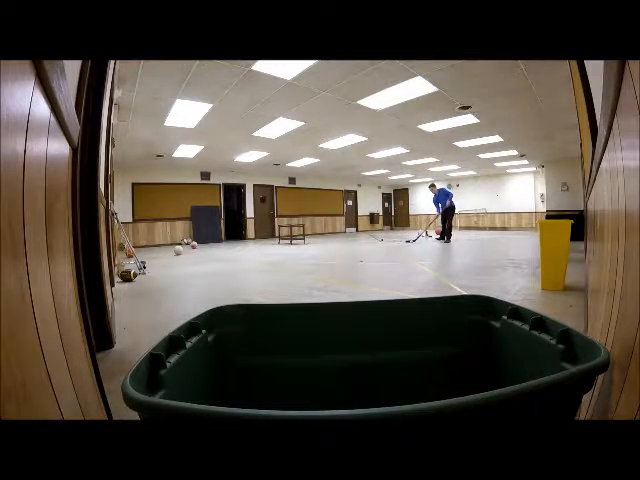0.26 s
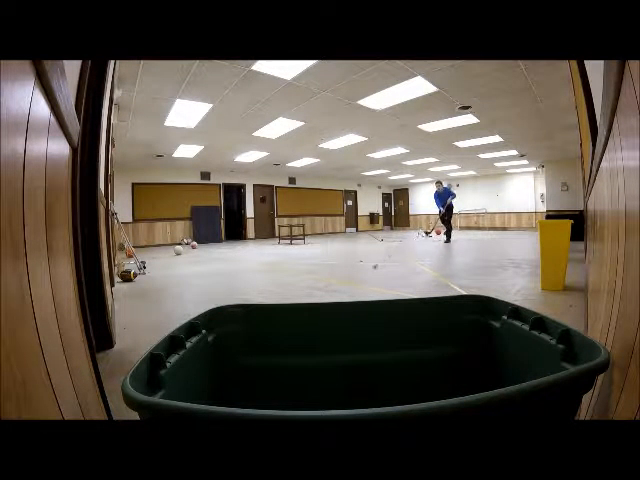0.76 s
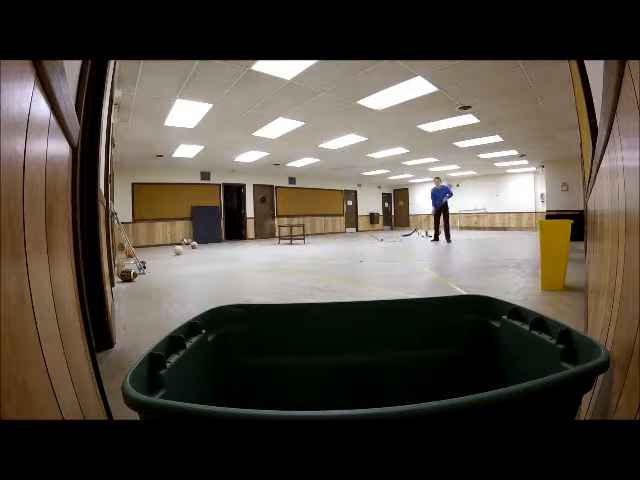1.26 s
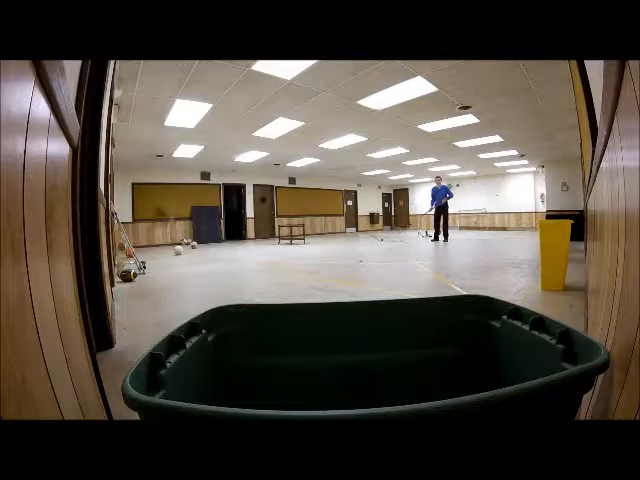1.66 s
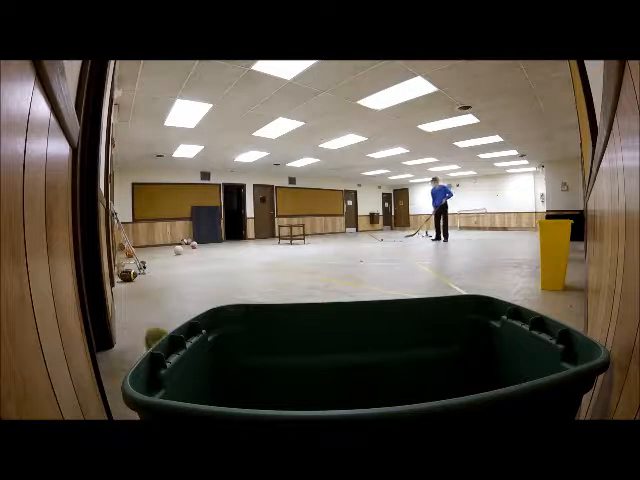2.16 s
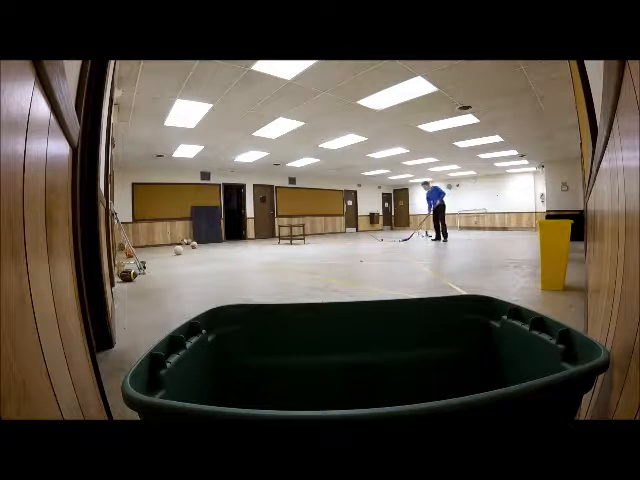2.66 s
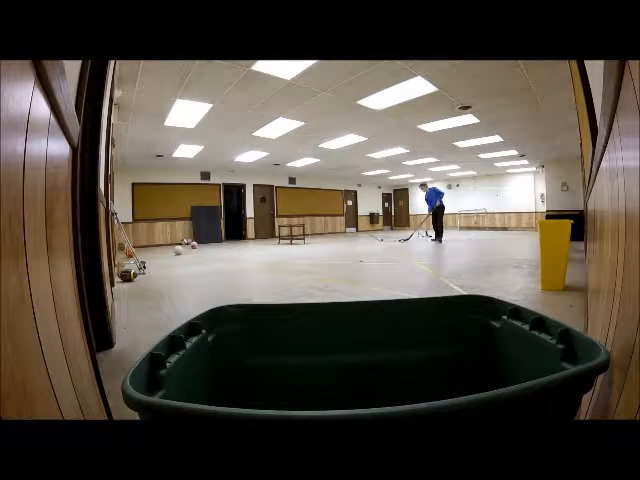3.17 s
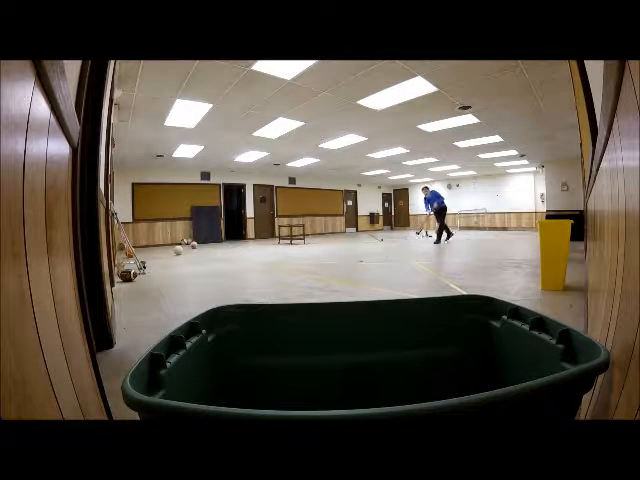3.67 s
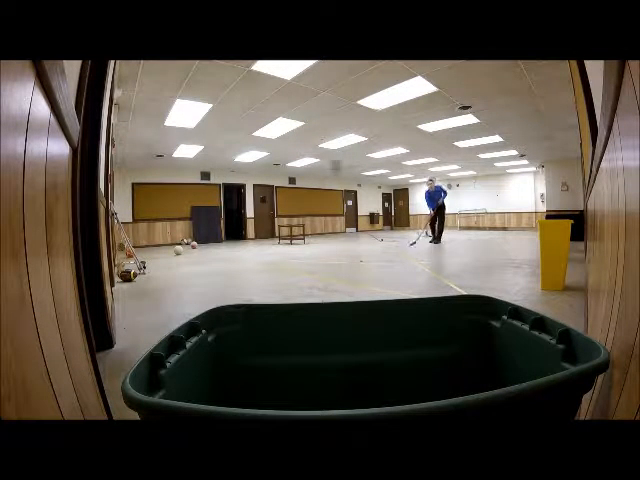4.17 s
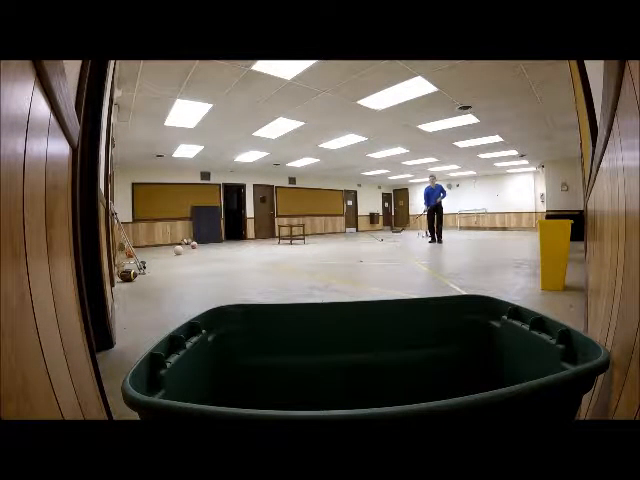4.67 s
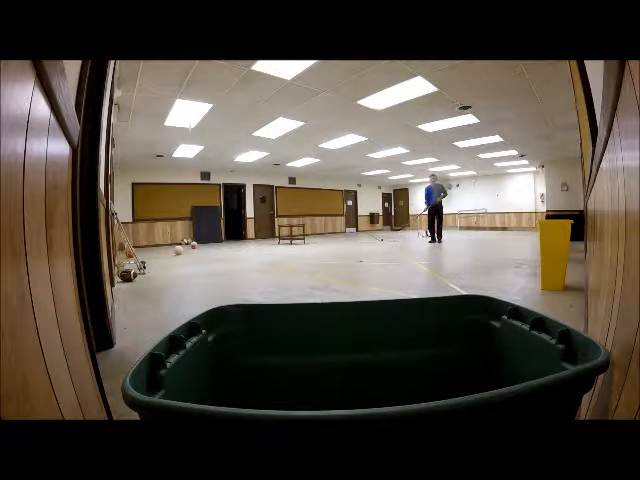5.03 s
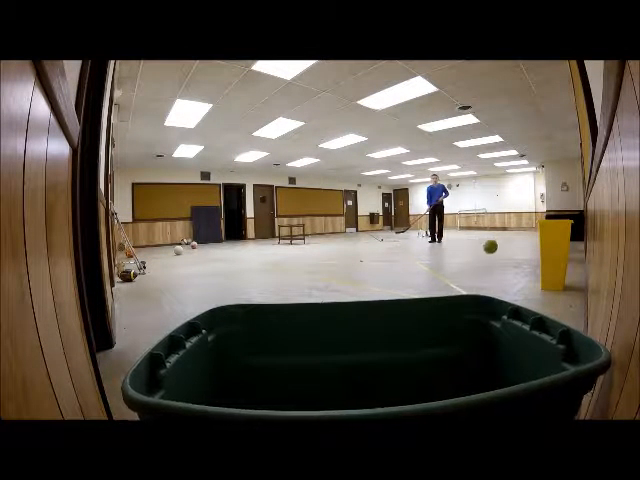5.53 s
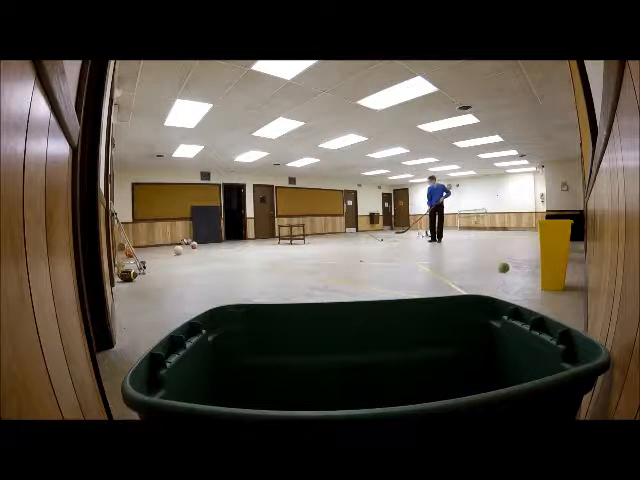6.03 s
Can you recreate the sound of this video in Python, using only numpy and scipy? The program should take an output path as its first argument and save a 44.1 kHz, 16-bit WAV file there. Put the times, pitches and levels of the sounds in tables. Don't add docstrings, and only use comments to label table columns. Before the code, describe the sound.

Rubber balls are swept by a stick across a big empty hall, thumping the floor, booming on wood panels and rattling a thin metal grille.

```python
import sys
import numpy as np
from scipy import signal
from scipy.fft import rfft, irfft, next_fast_len
from scipy.io import wavfile
from scipy.ndimage import map_coordinates

SR = 44100
rng = np.random.default_rng(int(sys.argv[2]) if len(sys.argv) > 2 else 0)


def invert_db(level):
    return 10 ** (np.asarray(level, dtype=float) / 20)


def persist_wave(psi):
    counts = np.round(np.clip(psi, -1, 1) * 32767).astype(np.int16)
    wavfile.write(sys.argv[1], SR, np.atleast_2d(counts).T)


N = 277830


def unit(x):
    return x / np.sqrt(np.mean(x ** 2) + 1e-20)


def along(points, hz):
    f, v = np.transpose(points)
    return np.interp(np.log(hz + 1), np.log(f + 1), v)


def filtered(x, response):
    m = next_fast_len(len(x) + 8192)
    return irfft(rfft(x, m) * response(np.fft.rfftfreq(m, 1 / SR)), m)[:len(x)]


def noise(spectrum, count):
    return unit(filtered(rng.standard_normal(count), lambda hz: invert_db(along(spectrum, hz))))


def wobble(rate):
    knots = rng.standard_normal(int(N * rate / SR) + 4)
    return map_coordinates(knots, [np.arange(N) * rate / SR])


def ring(t, hz, t60, rise):
    return np.sin(2 * np.pi * hz * t) * invert_db(-60 * t / t60) * (1 - np.exp(-(t / rise) ** 2))


def add(track, s, sound):
    start = round(s * SR)
    sound = sound[max(-start, 0):]
    part = track[max(start, 0):][:len(sound)]
    part += sound[:len(part)]


def swells(times, peaks_db, rise_db_s, fall_db_s, held=0):
    late = np.arange(N) / SR - np.asarray(times)[:, None]
    slope_db = np.minimum(rise_db_s * late, fall_db_s * (held - late))
    return np.asarray(peaks_db)[:, None] + np.minimum(0, slope_db)


# t/s, peak level/dB, f/Hz, t60/s
THUMPS = [
    (-.006, -11.5, 190, .065),
          (0.094, -20.5, 209.3, 0.12), (0.519, -21, 157, 0.039), (1.231, -35.5, 294, 0.068),
           (1.318, -14, 170, 0.045), (1.408, -25.5, 209, 0.054), (2.042, -6, 145, 0.047),
           (2.126, -16.5, 233, 0.028), (2.662, -19, 226, 0.036), (3.057, -20, 199, 0.04),
           (3.352, -28.5, 212, 0.058), (3.534, -24, 210, 0.021), (3.595, -17, 230, 0.032),
           (4.218, -13.5, 177, 0.05), (4.262, -21, 162, 0.042), (4.325, -21.5, 201.2, 0.032),
           (5.396, -7, 174, 0.043), (5.992, -13.5, 136, 0.018)]


def bounces():
    out, t = np.zeros(N), np.arange(SR // 5) / SR
    lag_s, push_db, push_hz, push_t60_s = .003, 3, 66, 0.089
    for s, db, hz, t60 in THUMPS:
        ball = invert_db(db + 9.5) * ring(t, hz, t60, rise=0.0026)
        slab = invert_db(db + push_db) * ring(t, push_hz, push_t60_s, rise=0.01)
        add(out, s + lag_s, ball - slab)
    return out


# t/s, rolling level/dB, shudder level/dB
STIRS = [
    (0.0, -38, -52.5),
    (.52, -33, -36.5),
    (1.43, -36, -30),
    (2.12, -72, -33.5),
    (3.2, -52.5, -38),
    (3.63, -32.5, -35.5),
    (3.75, -43, -40),
    (4.33, -34.5, -34),
    (5.55, -41, -40.5),
    (6.05, -63, -36),
]


def stirred(peaks_db, rest_db, rise_db_s, fall_db_s):
    times = [row[0] for row in STIRS]
    power = invert_db(swells(times, peaks_db, rise_db_s, fall_db_s)) ** 2
    return np.sqrt(power.sum(axis=0) + invert_db(rest_db) ** 2)


# t/s, depth level/dB
DUCKS = [
    (-.02, 8.5),
    (2.05, 2.2),
    (5.405, 2.5),
    (5.51, 9),
]


def ducking():
    drop_s, recover_s = .008, 0.25
    s, depth_db = np.transpose(DUCKS)[:, :, None]
    late = np.clip(np.arange(N) / SR - s, 0, None)
    return -np.sum(depth_db * (1 - np.exp(-late / drop_s)) * np.exp(-late / recover_s), axis=0)


# f/Hz, level/dB (per Hz)
RUMBLE = [(8, -26.5), (18, 8), (40, -2.5), (62, -8), (110, -9.5), (147, -6.5), (200, -12), (360, -31.5),
          (530, -33.5), (900, -50.5), (1500, -120)]
# f/Hz, level/dB (per Hz)
HISS = [(240, -46.5), (400, -4.5), (600, -5), (1000, -7), (2000, -11.5), (4000, -16.5), (8000, -24.5),
        (10000, -28), (13000, -35.5), (15300, -56), (17000, -100)]


def background():
    t, duck_db = np.arange(N) / SR, ducking()
    shudder = stirred(np.transpose(STIRS)[2], rest_db=-41, rise_db_s=55, fall_db_s=39)
    rumble = shudder * invert_db(1 + 2.42 * wobble(6.6)) * noise(RUMBLE, count=N)
    duct = noise([(30, -100), (62, -15.0), (76, 16.0), (85, 13.5), (95, 9.5), (106, 14.0),
                  (135, -11.0), (260, -110)], count=N)
    drone = invert_db(-43 + 0.43 * duck_db + 3.5) * duct
    flicker = 2 * np.cos(2 * np.pi * 15.5 * t)
    whine = invert_db(-86) * flicker * np.sin(2 * np.pi * 9635 * t + wobble(8))
    hiss = invert_db(-60.5) * noise(HISS, count=N)
    return rumble + drone + invert_db(duck_db) * (hiss + whine)


def rolling():
    travel = stirred(np.transpose(STIRS)[1], rest_db=-59, rise_db_s=103.5, fall_db_s=74.5)
    murmur = noise([(60, -100), (130, -31), (190, 1.5), (260, -2.5), (380, -7.0), (480, -23.5),
                    (700, -28.5), (1400, -110)], count=N)
    return travel * invert_db(1.85 * wobble(25)) * murmur


# t/s (delay), level/dB
ECHOES = [
    (0.0096, -8),
    (0.02, -11),
    (.052, -20),
]


def early_echoes(thumps, metal, rubber):
    out = np.zeros(N)
    for s, db in ECHOES:
        add(out, s, invert_db(db) * (invert_db(-9) * metal + invert_db(-9) * rubber + invert_db(-10.0) * thumps))
    return out


# f/Hz, t60/s
HALL = [(40, 0.85), (120, 0.52), (250, 0.44), (600, 0.37), (3000, 0.56), (6000, 0.44), (12000, 0.19)]


def hall(x):
    out, step = np.zeros(N), SR // 2
    starts = range(-step, N, step)
    hz, t, z = signal.stft(rng.standard_normal((len(starts), 3 * step // 2)), SR, nperseg=1024)
    fading = z * invert_db(-60 * t / along(HALL, hz)[:, None])
    tails = signal.istft(fading, SR, nperseg=1024)[1]
    padded, window = np.pad(x, (step, 2 * step)), signal.get_window("hann", 2 * step)
    for start, tail in zip(starts, tails):
        stretch = padded[start + step:][:2 * step] * window
        add(out, start / SR + .012, signal.fftconvolve(stretch, tail / np.linalg.norm(tail)))
    return out


# f/Hz, t60/s
BOOM_TONES = [
    [(21, 1.62), (45, 1.5)],
    [(92, 0.24), (108, 0.21)],
    [(150, 0.27), (165, 0.16)],
    [(200, 0.24), (222, 0.13)],
]
# t/s, then sway, deep, middle and upper level/dB
HARD_BOOMS = [
    (0.079, -27, -16, -27, -16),
    (2.042, -22.5, -8, -22, -38.5),
    (5.49, -12, -3.5, -27.5, -3),
    (5.52, -15.5, -28, -25, -34),
    (5.59, -21, -20, -19, -28.5),
]
# t/s, then sway, deep, middle and upper level/dB
SOFT_BOOMS = [
    (0.321, -29, -40, -27, -21),
    (2.45, -28.5, -25, -11.5, -14),
    (3.153, -31.5, -10.5, -48, -52),
]


def booms():
    out, t = np.zeros(N), np.arange(SR * 5 // 4) / SR
    fade = np.cos(np.pi / 2 * t / t[-1])
    lag_s, hard_contact_s, soft_contact_s = .0003, 0.002, .007
    blows = [(row, hard_contact_s) for row in HARD_BOOMS]
    blows += [(row, soft_contact_s) for row in SOFT_BOOMS]
    for (s, *levels), contact in blows:
        for db, pair in zip(levels, BOOM_TONES):
            tones = sum(ring(t, hz, t60, contact * (1 + (45 / hz) ** 2)) for hz, t60 in pair)
            add(out, s + lag_s, -invert_db(db - 1.5) * fade * tones)
    heavy = signal.butter(4, 280, fs=SR, output="sos")
    return signal.sosfilt(heavy, out)


# t/s, peak level/dB, centre f/Hz, t60/s, shell ring level/dB
SLAPS = [(0.095, -51, 1830, 0.043, -58), (0.446, -39, 2010, 0.045, -55), (0.5172, -34, 2180, 0.0376, -41.5),
         (1.24, -47.5, 2600, 0.11, -61), (1.321, -38, 805, 0.071, -62), (2.04, -28, 2880, 0.018, -49.5),
         (2.047, -32, 1860, 0.032, -55), (2.1279, -36, 2010, 0.0448, -37), (2.14, -46, 1800, 0.043, -62),
         (2.6653, -45.5, 2160, 0.045, -36.5), (2.676, -40, 2100, 0.049, -57),
         (3.0623, -53, 1900, 0.075, -41.5), (3.356, -57, 3150, 0.04, -45.5),
         (3.5362, -37, 1950, 0.046, -46), (3.5874, -45, 2030, 0.043, -57), (3.627, -36.5, 2930, 0.054, -53),
         (4.2204, -28, 2920, 0.028, -44), (4.2303, -36.5, 3050, 0.1, -45),
         (5.3988, -27, 2390, 0.025, -50.5), (5.4902, -29.5, 1870, 0.024, -41),
         (5.9948, -40, 2340, 0.027, -47)]
# t/s, peak level/dB, centre f/Hz, t60/s
SCUFFS = [
    (2.456, -42, 5200, 0.022),
    (2.679, -45.5, 4600, 0.11),
    (2.699, -51.5, 3230, 0.47),
    (5.409, -26.5, 3100, 0.017),
    (5.414, -45, 4584, 0.026),
    (5.425, -46, 3280, 0.04),
    (5.452, -45.5, 3067, 0.048),
    (5.518, -54, 2700, .03),
    (5.543, -46.5, 2630, .04),
]
# f/Hz, level/dB (per Hz)
SLAP_COLOUR = [(410, -15), (700, -4.5), (1860, -6), (3170, -6), (4070, -13.5), (6780, -24.5), (9570, -33),
               (12000, -38.5), (15600, -64), (22000, -120)]


def slaps():
    out, t = np.zeros(N), np.arange(SR // 4) / SR
    for s, db, centre_hz, t60, *_ in SLAPS + SCUFFS:
        def colour(hz):
            bright_band = np.exp(-(np.log((hz + 1) / centre_hz) / 0.12) ** 2)
            return 1.1 * invert_db(along(SLAP_COLOUR, hz)) + bright_band
        burst = unit(filtered(rng.standard_normal(len(t)), colour))
        add(out, s, invert_db(db - 5) * burst * invert_db(-60 * t / t60) * (1 - np.exp(-t / 0.0013)))
    for s, *_, shell_db in SLAPS:
        add(out, s, invert_db(shell_db + 5) * ring(t, 1227, 0.023, rise=0.0007))
    return out


# full speed t/s, held t/s, level/dB, grit bites at t/s, grit level/dB
SWEEPS = [
    (.465, 0.052, -45.5, .45, -54.5),
    (3.61, 0.033, -44, 3.535, -55),
]
# f/Hz, level/dB (per Hz)
BLADE = [(250, -40), (450, -3), (800, -4), (1300, 0), (2000, -2), (3000, -3), (4500, -8), (6000, -30),
         (9000, -110)]
# f/Hz, level/dB (per Hz)
GRIT = [(3800, -44), (4800, -4.5), (5800, -5.5), (6700, -11.5), (7900, -6), (9500, -22), (12000, -37),
        (14000, -76)]


def sweeps():
    out, t = np.zeros(N), np.arange(N) / SR
    band_low_hz, band_high_hz, climb_s = 2090, 2980, 0.021
    grit = invert_db(3.1 * wobble(900) + 0.83 * wobble(40)) * rng.standard_normal(N)
    body = unit(filtered(grit, lambda hz: invert_db(along(BLADE, hz))))
    treble = unit(filtered(grit, lambda hz: invert_db(along(GRIT, hz))))
    centres = np.array([1500, 2100, 2800, 3800])
    bands = [unit(filtered(grit, lambda hz: np.exp(-(np.log((hz + 1) / c) / .24) ** 2)))
             for c in centres]
    for s, held, db, bite, treble_db in SWEEPS:
        grit_db, = swells([bite], [treble_db], 500, 116, s + held - bite)
        speed_db, = swells([s], [0], 144, 75, held)
        climb = np.clip((t - s - held) / climb_s / 2 + 0.49, 0, 1)
        hz = band_low_hz + (band_high_hz - band_low_hz) * climb
        place = np.interp(hz, centres, np.arange(len(centres)))
        bright = sum(np.sqrt(np.clip(1 - abs(place - k), 0, 1)) * b for k, b in enumerate(bands))
        broad = 2.07 * invert_db(0.17 * speed_db) * body
        out += invert_db(db + speed_db - 10.5) * (broad + bright)
        out += invert_db(grit_db - 6.0) * treble
    return out


# t/s, peak level/dB, brightness level/dB
RATTLE = [(1.2417, -45, -13), (1.3253, -37, -10), (1.3328, -23, -11), (1.3865, -49.5, 3), (1.427, -50, -5),
          (1.4381, -31, -15.5), (1.463, -51, 2), (1.502, -30.5, -15), (1.552, -63, 9), (1.5674, -31, -15),
          (1.6074, -46, -34), (1.6146, -37.5, -21), (4.259, -33, -18), (4.2848, -26, -12.5),
          (4.3395, -42, -25), (4.342, -31, -17), (4.375, -31.5, -12), (4.427, -49, -6), (4.455, -44.5, -16),
          (4.5044, -42, -23.5), (4.5228, -44, -33.5), (4.5454, -40, -20)]
# f/Hz, level/dB, t60/s
GRILLE = [(2417, -19, 0.086), (2729, -9, 0.07), (3101, -13, 0.098), (3338, 0, 0.048), (3763, -14, 0.088),
          (4576, -8, 0.06), (5146, -13, 0.092), (5825, -27, 0.14), (6288, -27, 0.14), (7257, -21, 0.091),
          (7973, -31, 0.2), (8495, -25, 0.065), (9028, -38, 0.26), (9674, -33, 0.098), (10680, -40, 0.18),
          (10990, -37, 0.1)]


def rebound(x):
    delay_s, level_db = .0098, -2.5
    return x + invert_db(level_db) * np.pad(x, (round(delay_s * SR), 0))[:N]


def rattle():
    tone, loose, t = np.zeros(N), np.zeros(N), np.arange(SR // 4) / SR
    hz, level, t60 = np.transpose(GRILLE)[:, :, None]
    luck = rng.standard_normal((len(RATTLE), 2, len(GRILLE), 1))
    buzz_fade = invert_db(-60 * t / 0.048) + .5 * invert_db(-60 * t / 0.0063)
    buzz_shape = buzz_fade * (1 - np.exp(-(t / 0.00022) ** 2))
    for (s, db, bright_db), (size, detune) in zip(RATTLE, luck):
        tilt_db = (bright_db + 15.0) * np.clip(hz / 4000 - 1, 0, 1)
        strength = invert_db(2.5 * size) * invert_db(level * 0.94 + tilt_db)
        tones = ring(t, hz * (1 + 0.0044 * detune), np.minimum(t60, .048), rise=0.0017)
        add(tone, s, invert_db(db - 9.5) * np.sum(strength * tones, axis=0))
        buzz = noise([(600, -70), (1200, -16.5), (2200, -14), (2700, 2.0), (3500, 3.0), (5300, -10.0),
                      (6800, bright_db - 2), (8200, bright_db), (11000, bright_db - 17.5),
                      (15000, -53), (18000, -100)], count=len(t))
        add(loose, s, invert_db(db - 6.5) * buzz * buzz_shape)
    return rebound(tone), rebound(loose)


# t/s, peak level/dB
SNAPS = [
    (5.5022, -25),
]


def snap():
    out, u = np.zeros(N), np.arange(SR // 100) / SR / .00012
    for s, db in SNAPS:
        add(out, s, -invert_db(db) * u * np.exp(1 - u))
    return out


def scene():
    thumps, panel, rubber, blade = bounces(), booms(), slaps(), sweeps()
    tone, loose = rattle()
    reflected = thumps * (1 - np.exp(-(np.arange(N) / SR / .004) ** 2))
    early = early_echoes(reflected, tone + loose, rubber)
    wet = invert_db(-21.0) * tone + invert_db(-10) * loose + invert_db(-16) * rubber
    wet += invert_db(-7) * reflected + invert_db(-13.5) * panel + invert_db(-8.0) * blade
    direct = thumps + tone + loose + rubber + panel + blade + snap()
    return (direct + early + hall(wet) + rolling() + background())[None]


def top_cut(x):
    return signal.sosfilt(signal.butter(12, 15480, fs=SR, output="sos"), x)


def record(dry):
    top = .93
    limited = dry / (1 + abs(dry / top) ** 12) ** (1 / 12)
    return top_cut(limited)


dry = scene()
out = record(dry)
persist_wave(out)
```